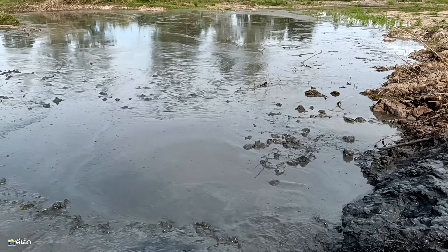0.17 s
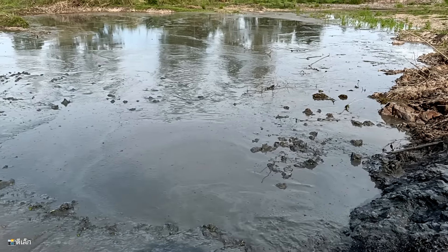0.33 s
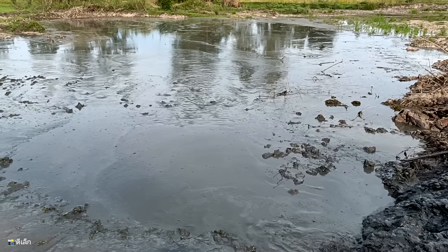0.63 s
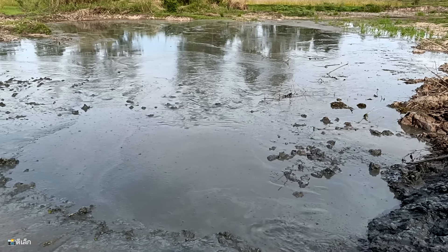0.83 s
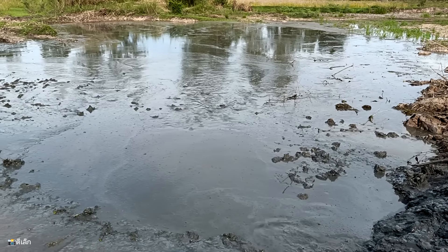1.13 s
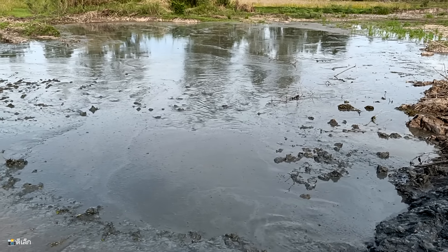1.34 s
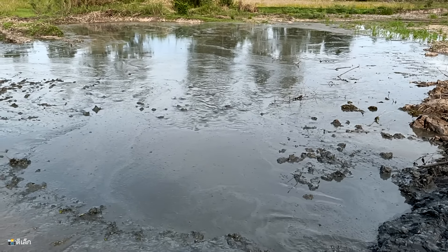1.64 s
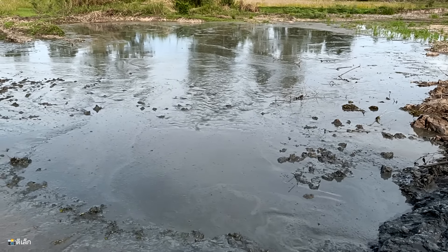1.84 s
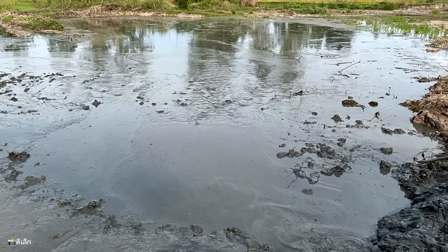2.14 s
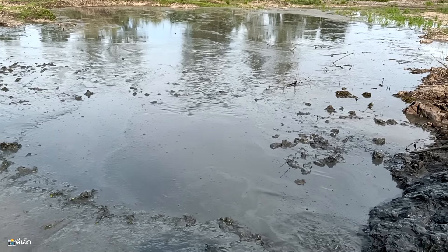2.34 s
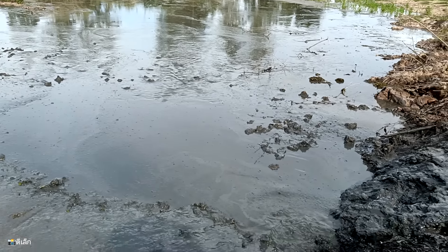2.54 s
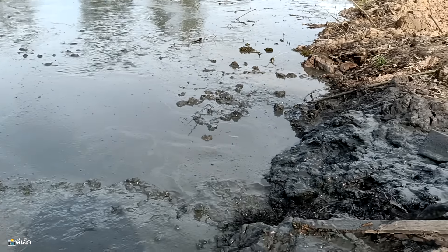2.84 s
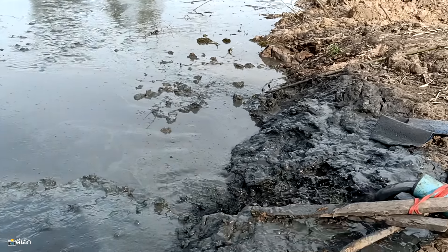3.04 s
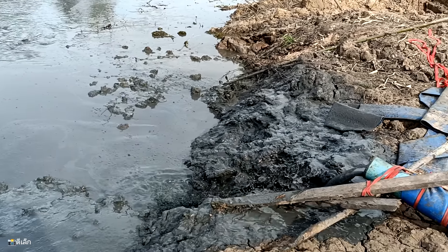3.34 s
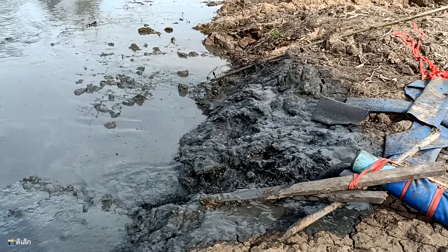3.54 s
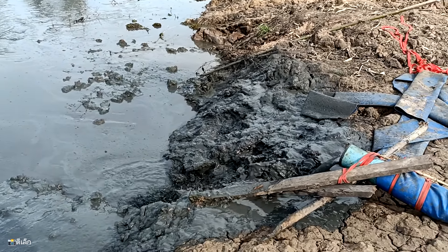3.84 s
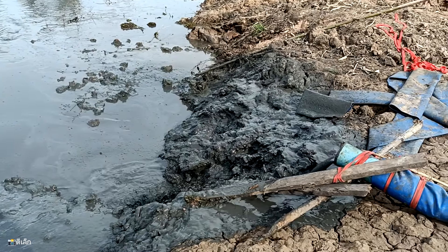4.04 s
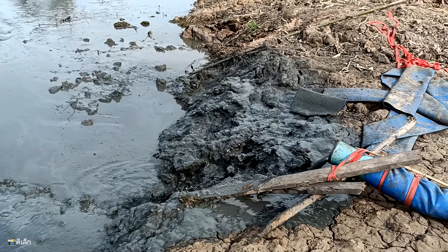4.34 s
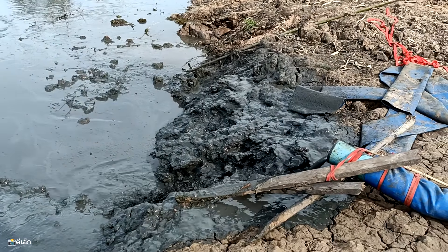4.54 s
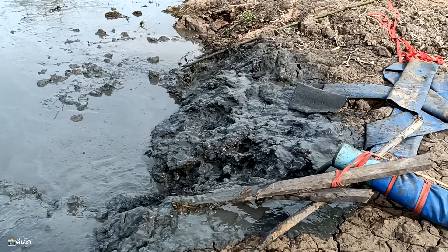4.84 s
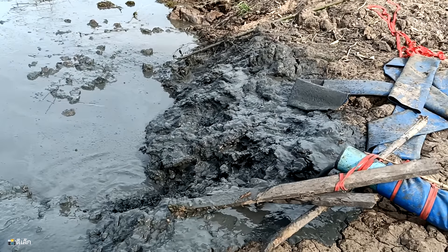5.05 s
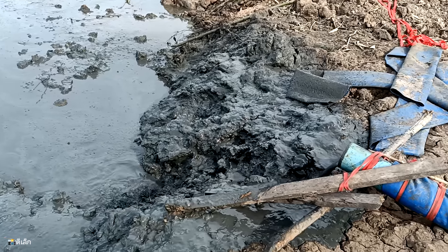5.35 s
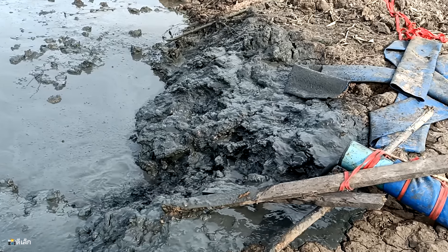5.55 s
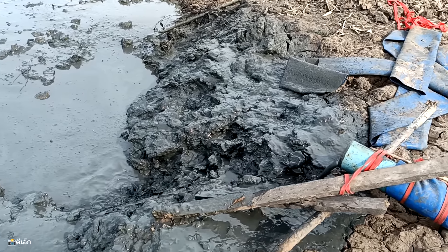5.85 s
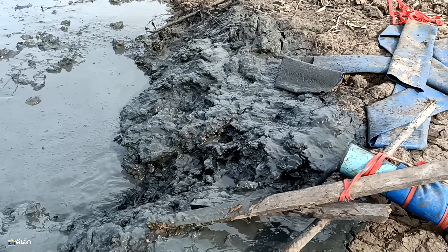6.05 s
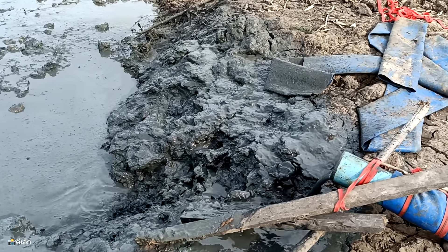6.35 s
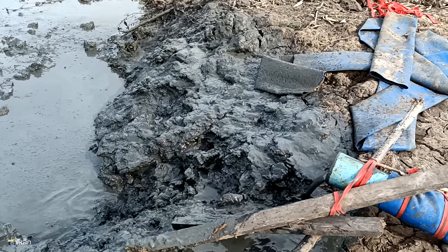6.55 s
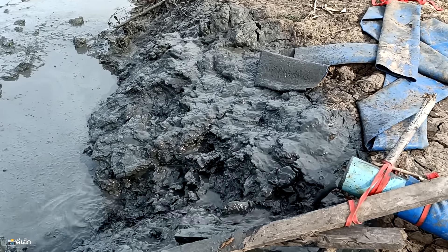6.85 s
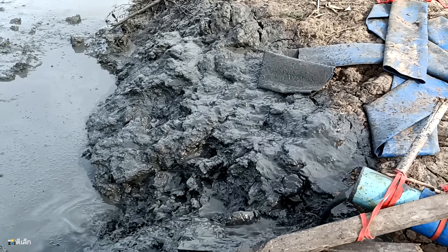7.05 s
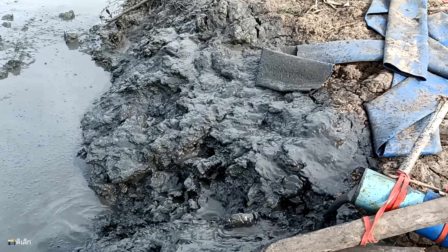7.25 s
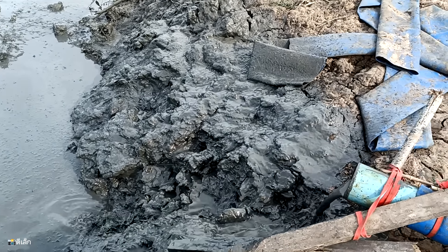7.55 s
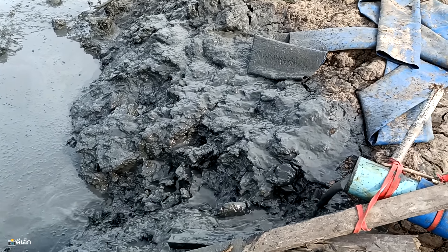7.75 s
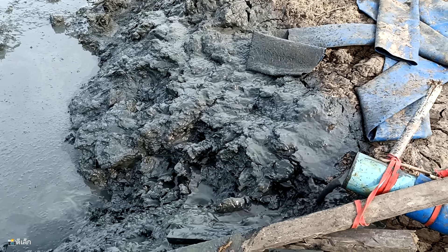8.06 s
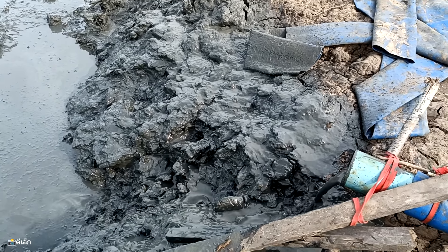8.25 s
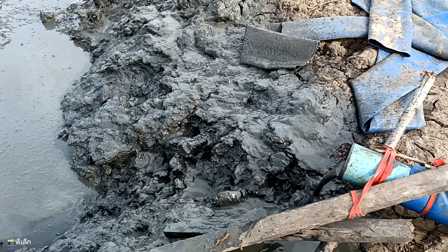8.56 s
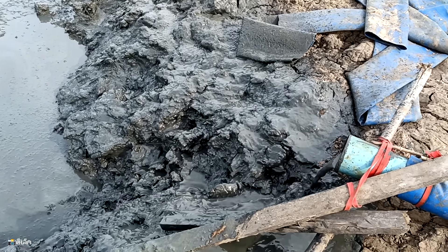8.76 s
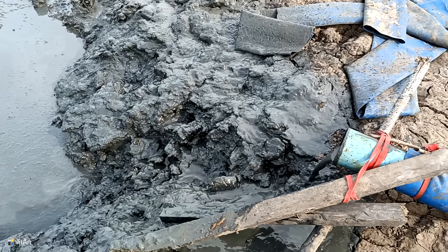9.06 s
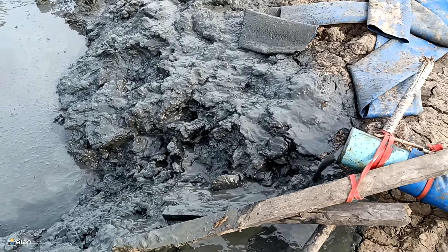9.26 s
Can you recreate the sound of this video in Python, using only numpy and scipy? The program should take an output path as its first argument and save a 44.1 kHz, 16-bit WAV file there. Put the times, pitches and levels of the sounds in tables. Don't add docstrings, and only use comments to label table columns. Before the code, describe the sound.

Steady rough diesel chugging with metallic clatter over a pond, gradually receding while close mud drops pop, loose metal rattles and fine spray crackles.

```python
import sys
import numpy as np
from scipy import signal
from scipy.fft import rfft, irfft, next_fast_len
from scipy.io import wavfile
from scipy.ndimage import uniform_filter1d, map_coordinates

SR = 44100
rng = np.random.default_rng(int(sys.argv[2]) if len(sys.argv) > 2 else 0)


def rack_gain(trim_db):
    fader = np.asarray(trim_db, float)
    return 10 ** (fader / 20)


def wav_record(signal):
    frames = np.transpose(np.atleast_2d(signal))
    bounded = np.clip(frames, -1, 1)
    quanta = np.round(bounded * 32767).astype(np.int16)
    wavfile.write(sys.argv[1], SR, quanta)


N = 414533


def unit(x):
    return x / np.sqrt(np.mean(x ** 2) + 1e-20)


def along(points, hz):
    f, v = np.transpose(points)
    return np.interp(np.log(hz + 1), np.log(f + 1), v)


def curves(rows, step=1):
    s, *cols = np.transpose(rows)
    return [np.interp(np.arange(0, N, step) / SR, s, c) for c in cols]


def wobble(rate, step=1):
    at = np.arange(0, N + 64, 64)
    knots = rng.standard_normal(int(N * rate / SR) + 4)
    return np.interp(np.arange(0, N, step), at, map_coordinates(knots, [at * rate / SR]))


def coloured(x, spectrum, top_hz=SR):
    pad = [(0, 0)] * (x.ndim - 1) + [(2048, 2048)]
    m = next_fast_len(N + 8192)
    hz = np.fft.rfftfreq(m, 1 / SR)
    wide = rfft(np.pad(x, pad, mode="reflect", reflect_type="odd"), m)
    return irfft(wide * rack_gain(along(spectrum, hz)) * (hz < top_hz), m)[..., 2048:N + 2048]


def rush(spectrum, patchy_db):
    z = signal.stft(rng.standard_normal(N + 2048), nperseg=512)[2]
    field = uniform_filter1d(rng.standard_normal(z.shape), size=6, axis=0)
    field = uniform_filter1d(field, size=8, axis=1)
    noise = signal.istft(z * rack_gain(patchy_db * unit(field)), nperseg=512)[1][512:N + 512]
    return unit(coloured(noise, spectrum))


def ports(direct, lag_ms, alike=1, scatter=0, order=3):
    late = map_coordinates(direct, [np.arange(N) - lag_ms * SR / 1000], order=order, mode="nearest")
    alike = np.clip(alike, 0, 1)
    return np.sqrt(alike) * np.array([late, direct]) + np.sqrt(1 - alike) * np.asarray(scatter)


def grains(s, hz, db, cycles, rise, size, snap=4):
    n = np.arange(size)
    turns = hz[:, None] * n / SR
    life = turns / np.reshape(cycles, (-1, 1))
    wave = np.sin(2 * np.pi * turns * (1 + rise * np.minimum(life, 2) / 2))
    wave = wave * np.exp(-life) * (1 - np.exp(-snap * life))
    at = (np.round(s * SR).astype(int)[:, None] + n).ravel()
    return np.bincount(at, (rack_gain(db)[:, None] * wave).ravel(), N + size + 9)[:N]


def bursts(s, db, t60, size):
    n = np.arange(size)
    wave = rng.standard_normal((len(s), size)) * rack_gain(db[:, None] - 60 * n / SR / np.reshape(t60, (-1, 1)))
    at = (np.round(s * SR).astype(int)[:, None] + n).ravel()
    return np.bincount(at, wave.ravel(), N + size + 9)[:N]


CYCLE_HZ = 9.4
# t/s, phase/cycles
CRANK_DRIFT = [(0.15, -0.063), (0.6, -0.115), (1.1, -0.151), (1.6, -0.166), (2.1, -0.154), (2.7, -0.123),
               (3.4, -0.11), (4.2, -0.109), (5.0, -0.083), (6.0, -0.095), (7.0, -0.09), (8.0, -0.085),
               (9.2, -0.086)]


def crank():
    return CYCLE_HZ * np.arange(N) / SR + curves(CRANK_DRIFT)[0]


# t/cycle, level/dB
FIRINGS = [
    (0.23, 0.3),
    (0.29, 0.2),
    (0.433, -5.4),
    (0.631, -3.7),
    (0.811, -4.5),
    (0.961, 2.0),
]
# f/Hz, width/Hz, signed gain/1
PIPE_MODES = [(116, 70, -0.31), (86, 8, -0.31), (125, 8, 0.91), (188, 55, 0.17)]
# multiple of the cycle rate/1, rms level/dB
HARMONICS = [(3, -55), (4, -54), (5, -46), (6, -37), (7, -43), (8, -46), (9, -34), (10, -37), (11, -39),
             (12, -29.5), (13, -31.5), (14, -38), (15, -35), (16, -43), (17, -44), (18, -36), (19, -38),
             (20, -50), (21, -38), (22, -44), (23, -58), (24, -53), (25, -54), (26, -60), (27, -56),
             (28, -60)]
BEAM_SHARE = {4: -.8, 5: -.4, 6: .95, 11: .4, 12: .75, 13: .45, 14: .6, 15: 1.0, 18: -.2}
# f/Hz, level/dB per Hz
RUMBLE_SPECTRUM = [(15, -62), (40, -21), (60, -19), (95, -2.5), (108, 0), (116, 5), (126, -2), (150, -9),
                   (230, -13), (255, -23.5), (420, -33), (600, -92)]


def exhaust():
    turn = crank()[::8]
    when, blow_db = np.transpose(FIRINGS)
    beam, roar_ms, *_ = camera()
    lift_db = 9.5 * beam
    tone = 0
    for k, db in HARMONICS:
        jf = 1j * k * CYCLE_HZ
        pipe = sum(g * jf * w / (c * c + jf * jf + jf * w) for c, w, g in PIPE_MODES) * (jf / (40 + jf)) ** 2
        phase = np.angle(pipe * np.sum(rack_gain(blow_db) * np.exp(-2j * np.pi * k * when)))
        gain = rack_gain(db + 3 + lift_db[::8] * BEAM_SHARE.get(k, 0) + 1.2 * wobble(1.2, 8))
        tone = tone + gain * np.cos(2 * np.pi * k * turn + phase + .01 * k * wobble(2.5, 8))
    tone = np.pad(tone, 40, mode="reflect", reflect_type="odd")
    tone = signal.resample_poly(tone, 8, 1)[320:N + 320]
    lag_ms = .6 * roar_ms
    rumble_db = -30.2 - .1 * lift_db + .9 * wobble(2.66)
    throb_db = 2.6 * np.cos(2 * np.pi * (crank() - .17))
    rumble = np.array([rush(RUMBLE_SPECTRUM, patchy_db=.6) for _ in "lmr"])
    rumble = ports(rumble[1], lag_ms, order=1) + .15 * rumble[::2]
    return ports(tone, lag_ms, order=1) + rack_gain(rumble_db + throb_db) * rumble


# t/s, level/dB
ENGINE_FADE = [(0, -1), (1.2, -0.35), (2, -1), (2.6, -4), (3.4, -4.5), (4.3, -4), (4.8, -7), (5.7, -9),
               (6.2, -9.5), (7.3, -9.5), (8, -11), (8.6, -11.5), (9.4, -12)]
CLATTER_FADES = 1.044
# f/Hz, level/dB per Hz
ROAR_SPECTRUM = [(300, -2), (480, -10), (650, 1), (800, -0.5), (1000, 2.5), (1250, -1.5), (1600, -15.5),
                 (2200, -28)]
# f/Hz, level/dB per Hz
CLATTER_SPECTRUM = [(900, -71), (1450, -0.5), (1680, 1.5), (1900, 2.5), (2100, 4), (2600, 7), (3100, 4),
                    (3500, 1.5), (4200, -2.5), (4800, -3.5), (5300, -3), (6300, -2.5), (8000, -4),
                    (16000, -6.5)]


def block():
    fade_db, = curves(ENGINE_FADE)
    _, roar_ms, clatter_ms, alike, turn = camera()

    def beat(k, at):
        return np.cos(2 * np.pi * k * (crank() - at))

    roar_db = -27.5 + .85 * fade_db + .7 * beat(1, .8) + .4 * beat(6, .1) + .9 * wobble(9)
    clatter_db = -24.5 + CLATTER_FADES * fade_db + wobble(8)
    clatter_db = clatter_db + .6 * beat(2, .1) + .7 * beat(6, .09) + .3 * beat(1, .6)
    scattered = [(300, -15), (480, -16)] + ROAR_SPECTRUM[2:]
    roar = [rush(tone, patchy_db=1.2) for tone in (ROAR_SPECTRUM, scattered, scattered)]
    clatter = [rush(CLATTER_SPECTRUM, patchy_db=2.5) for _ in "mlr"]
    clatter_alike = np.interp(turn ** 8, (0, 1), (.14, .65))
    shade = rack_gain(np.outer([-1.5, 0], fade_db / fade_db.min()))
    roar = rack_gain(roar_db) * ports(roar[0], roar_ms, alike, roar[1:], order=1)
    return roar + rack_gain(clatter_db) * shade * ports(clatter[0], clatter_ms, clatter_alike, clatter[1:])


def valves():
    at = np.flatnonzero(np.diff(np.floor(2 * (crank() - .08))) > 0)
    draw = rng.standard_normal((len(at), 3))
    db = (CLATTER_FADES * curves(ENGINE_FADE)[0] + 3 * wobble(1.8))[at] - 26 + 0.88 * draw[:, 0]
    db = db + 10 * np.exp(-((at / SR - 5.16) / .16) ** 2)
    s = at / SR + 0.0015 * draw[:, 1] ** 2
    tick = grains(s, 7000 * np.exp(0.019 * draw[:, 2]), db + 1, 14 + 0 * s, 0, size=500)
    tick = tick + bursts(s, db + 6.0, 0.03 + 0 * s, size=700)
    tick = coloured(tick, [(1500, -40), (3000, -16), (7000, -2.0), (10000, -25), (16000, -20)])
    return ports(tick, camera()[2])


# f/Hz, width/Hz, level/dB
FRAME_MODES = [(2495, 200, -1), (2904, 260, 0.5), (3540, 63, 1), (4840, 170, -8), (6040, 300, -10.5)]
# t/s, level/dB
FRAME_SHAKE = [(0, -69), (2.5, -38.5), (4.45, -41), (4.65, -42), (4.85, -38.5), (5.4, -37), (6.3, -40.5),
               (7.2, -45), (7.7, -40), (8, -38), (8.5, -43.5), (9.4, -42)]


def rattle():
    m = next_fast_len(N)
    hz = np.fft.rfftfreq(m, 1 / SR)
    shared_db = 2.2 * wobble(25) + 2 * np.cos(4 * np.pi * (crank() - .1))
    ring = 0
    for c, w, db in FRAME_MODES:
        bout = rack_gain(shared_db + 1.8 * wobble(40) + 1.6 * wobble(5.3))
        mode = rack_gain(db) * 1j * hz * w / (c * c - hz * hz + 1j * hz * w)
        ring = ring + irfft(rfft(bout * rng.standard_normal(N), m) * mode, m)[:N]
    return rack_gain(curves(FRAME_SHAKE)[0]) * rack_gain([[-12], [1]]) * ports(unit(ring), camera()[2])


# t/s, f/Hz, rms level/dB
IMPELLER_HUM = [
    (0, 153.3, -28),
    (.65, 150, -26.5),
    (.9, 145, -35),
    (1.15, 127.4, -48),
    (2.2, 135.3, -28.5),
    (3.2, 130.7, -38),
    (4.5, 135.5, -37),
    (6.5, 132.6, -30.5),
    (9.4, 132.5, -52),
]


def impeller():
    hz, db = curves(IMPELLER_HUM)
    phase = 2 * np.pi * np.cumsum(hz + 0.46 * wobble(3.42)) / SR
    return rack_gain(db + 5.0 + 0.48 * wobble(4.0)) * np.sin(phase)


# delay/ms, gain/1, drift/ms
REFLECTIONS = [
    (0.618, 0.073, 0.037),
    (2.35, 0.15, 0.04),
]


def echoed(pair):
    out, dull = pair, uniform_filter1d(pair, size=5, axis=1)
    n = np.arange(N)
    for ms, gain, drift_ms in REFLECTIONS:
        late = [n - (ms + drift_ms * wobble(0.86)) * SR / 1000 for _ in pair]
        echo = [share * np.interp(at, n, x) for at, x, share in zip(late, dull, (.5, 1))]
        out = out + gain * np.array(echo)
    return out


# f/Hz, level/dB per Hz
GUSH_SPECTRUM = [(150, -53), (220, -8), (300, -6), (400, -8.5), (450, -13.5), (540, -23.5)]
# t/s, peak level/dB, f/Hz
AIR_POCKETS = [
    (0.576, -15, 294),
    (0.649, -11.5, 268),
    (1.1, -27, 710),
    (1.142, -9, 255),
    (5.2, -31, 1050),
    (5.499, -21.5, 1030),
    (6.2, -28, 1400),
    (7.301, -26, 990),
    (8.663, -31, 1900),
]


def gush():
    s, db, hz = np.transpose(AIR_POCKETS)
    lumps = rack_gain(-26 - 23 * camera()[4] ** 2 + 2.0 * wobble(25))
    gurgle = [rush(GUSH_SPECTRUM, patchy_db=-2.0) for _ in "mlr"]
    plops = grains(s, hz, db, 2.0 + hz / 250, 0.014, size=2500)
    return lumps * ports(gurgle[0], 0.013, 0.95, gurgle[1:], order=1) + plops


# t/s, peak level/dB
FRAME_KNOCKS = [(2.6259, -29), (2.8215, -24), (2.8355, -18.5), (3.015, -23), (3.1413, -23), (3.456, -17),
                (3.5848, -25), (3.7943, -22), (4.5346, -36), (4.594, -26), (4.6294, -24), (4.638, -28),
                (4.647, -24), (4.6838, -25), (5.0619, -28), (5.408, -22.5), (5.4281, -24), (5.6895, -27),
                (5.9145, -26), (7.6151, -31), (7.633, -29), (7.6494, -30), (7.684, -29), (7.6949, -19),
                (7.7834, -38), (7.8, -21.5), (7.8213, -29), (7.9066, -33), (8.2442, -32), (8.2626, -31),
                (8.304, -22), (8.3509, -24), (8.401, -28), (8.455, -24), (8.504, -23.5), (8.5989, -24),
                (8.9092, -29), (9.1366, -30)]
# t/s, peak level/dB,
# bubble f/Hz
MUD_DROPS = [(0.3875, -18, 4000), (0.4594, -18, 2870), (2.591, -25, 3150), (2.7867, -24, 3800),
             (3.0515, -26, 3440), (3.134, -25, 3550), (3.2192, -16.5, 5600), (4.0997, -27, 2550),
             (4.3224, -22, 4900), (4.462, -27, 6710), (4.576, -22, 3850), (4.596, -18, 5270),
             (4.6025, -18, 4850), (4.9646, -30, 3210), (5.1243, -24, 7000), (5.179, -28, 7000),
             (5.233, -24, 7100), (5.337, -27, 7060), (5.2849, -29, 2630), (5.297, -28, 2550),
             (5.306, -29, 2580), (5.8726, -29, 3000), (6.154, -18, 5400), (6.354, -17.5, 4800),
             (6.4163, -23, 4650), (6.547, -19.5, 4840), (6.7639, -23.5, 2800), (6.8267, -29, 3120),
             (6.9835, -19, 3050), (7.08, -24, 4840), (7.236, -27, 2650), (8.0122, -21, 5250),
             (8.157, -29, 2880), (8.324, -19, 6040), (8.3764, -25.5, 5600)]
# t/s, peak level/dB, bubble f/Hz
MUD_SPECKS = [(2.4967, -25, 4800), (3.0869, -18, 6746), (3.3667, -38, 6140), (3.6901, -28, 6500),
              (3.7294, -23, 6240), (3.895, -20, 4056), (4.0018, -26, 4690), (4.3605, -19, 4700),
              (4.4154, -16, 6520), (4.5346, -19, 4900), (4.566, -25, 4160), (4.8414, -25, 4010),
              (5.0125, -30, 4677), (5.0614, -25, 4060), (5.1796, -31, 4630), (5.233, -24, 6700),
              (5.3358, -30, 4530), (5.3662, -19.5, 4100), (5.6535, -27, 6100), (5.8606, -28, 6350),
              (5.9174, -28, 4730), (6.0821, -23, 4730), (6.1325, -23, 4870), (6.4482, -26, 5100),
              (6.4936, -28, 5800), (6.6409, -25, 4700), (6.6907, -22, 6220), (6.8718, -24, 6400),
              (6.9954, -28, 5780), (7.0074, -29, 5760), (7.0559, -26, 5840), (7.3567, -39, 4270),
              (7.4969, -28, 5740), (7.9184, -26, 5120), (7.9977, -30, 5445), (8.2242, -24, 6040),
              (8.5999, -32, 5900), (9.201, -26, 5830)]


def splatter():
    loose = rng.random((120, 2))
    at = loose[:, 0] * (N - 1)
    s, db = np.transpose(FRAME_KNOCKS)
    s = np.r_[s, at / SR]
    tick_db = curves(FRAME_SHAKE)[0][at.astype(int)] + 2 + np.minimum(-3 * np.log(loose[:, 1]), 7)
    db = np.r_[db + 6, tick_db]
    detune = np.exp(0.01 * rng.standard_normal(len(s)))
    rings = sum(grains(s, c * detune, db + level - 5.0, 18 + 0 * s, 0, size=900)
                for c, _, level in FRAME_MODES[2:])
    crack = bursts(s, db - 9, 0.042 + 0 * s, size=600)
    s, db, hz = np.transpose(MUD_DROPS + [(s, db - 2.5, hz) for s, db, hz in MUD_SPECKS])
    draw = rng.standard_normal((len(s), 8))
    spread = np.linspace(-1.3, 1.7, num=4) + 0.34 * draw[:, 4:]
    drops = sum(grains(s + .0008 * draw[:, k] ** 2, hz * np.exp(0.098 * spread[:, k]), db - 4,
                       9 + 0 * s, 0.024, size=500, snap=30) for k in range(4))
    crack = crack + bursts(s, db, 0.1 + 0 * s, size=600)
    crack = coloured(crack, [(1200, -15), (2500, -2.5), (16000, -13.5)])
    draw = rng.random((1500, 4))
    drip_hz = 700 * 10 ** np.sqrt(draw[:, 1])
    drip_db = -30.5 - 6.5 * draw[:, 0] + np.minimum(-4 * np.log(draw[:, 2]), 12)
    drips = grains(draw[:, 0] * N / SR, drip_hz, drip_db, 2 + 9 * draw[:, 3] ** 2, 0.042, size=400)
    chirp = grains(*np.array([[8.657], [5530], [-29]]), 80, 0.062, size=1800)
    return ports(drops + drips + chirp + crack, 0.318) + rack_gain([[-24], [1]]) * ports(rings, 0.28)


def ebb_db(s):
    return 14 * np.clip(s - 8.1, 0, None)


# t/s, peak level/dB, left-right level/dB
SPRAY_SNAPS = [(2.5566, -31, 2), (3.0515, -29, -10), (3.0869, -27.5, -4), (3.2181, -24, -6),
               (3.5034, -30, 7), (3.6905, -33, -5), (4.4154, -27, -0.5), (4.4623, -31, 0),
               (4.5346, -32, -7), (4.6024, -21.5, -5), (4.9646, -30, -8), (5.656, -35, 6), (5.7084, -54, 2),
               (6.1529, -37, 13), (6.354, -35, 4.0), (6.546, -41, 0.0), (6.8194, -32, 3.5),
               (6.8708, -33, 1), (6.9825, -43, 3.5), (7.0908, -34, 4.5), (7.2355, -35, 4.5),
               (7.2943, -36, 14), (7.3557, -34, 17), (7.4654, -36, 5.5), (7.8116, -31, 5.0),
               (8.1648, -36, 5.0), (8.1973, -29, 2), (8.312, -38, 3.0), (8.324, -30, 17), (8.67, -41, 6),
               (8.748, -39, 5), (8.762, -42, 5), (8.796, -39, 4), (8.8814, -38, 3), (8.9657, -47, 0),
               (9.168, -42, 5), (9.201, -38, 4), (9.252, -43, 4), (9.3323, -41, 2)]


def spray():
    s, db, pan_db = np.transpose(SPRAY_SNAPS)
    draw = rng.random((800, 4))
    at = draw[:, 0] * (N - 1)
    fizz_db = -17 - 12.5 * (1 - camera()[0]) ** 2.2 + 2.5 * wobble(4.8)
    spurt_db = fizz_db[at.astype(int)] + np.minimum(-4 * np.log(draw[:, 1]), 7)
    spurt_db -= ebb_db(at / SR) + 5 * np.clip(1 - at / SR / 3, 0, 1)
    t60 = np.r_[.02 + 0 * s, .005 + .04 * draw[:, 3] ** 2]
    s, db = np.r_[s, at / SR], np.r_[db + 14.5, spurt_db]
    pan_db = np.r_[pan_db - 1, 12 * (draw[:, 2] - .5)]
    pair = [bursts(s, db + side * pan_db, t60, size=900) for side in (.5, -.5)]
    return coloured(np.array(pair), [(2000, -46), (4000, -14), (7000, -3.0), (10000, -8.0), (16000, -14)])


# t/s, peak level/dB
MIST_SPITS = [(2.6184, -39), (2.809, -40), (3.2186, -33), (3.3134, -41), (3.3762, -39), (3.7683, -38),
              (4.4159, -30), (4.6024, -36), (5.2574, -37), (5.6002, -44), (5.9888, -38), (6.1534, -33),
              (6.3246, -44), (6.354, -37), (6.4562, -43), (6.6608, -47), (6.7394, -47), (6.7954, -48),
              (6.2184, -47), (6.7592, -43), (6.8778, -36), (7.1501, -35), (7.3407, -41), (7.4959, -35),
              (7.6889, -36), (7.8126, -38), (7.8451, -39), (7.859, -33), (7.9159, -42), (8.0707, -45),
              (8.0795, -36), (8.18, -42), (8.2224, -40), (8.5726, -41), (9.3327, -43)]


def mist():
    s, db = np.transpose(MIST_SPITS)
    draw = rng.random((500, 3))
    at = draw[:, 0] * (N - 1)
    weak_db = -38 + 5 * wobble(12)[at.astype(int)] + np.minimum(-4 * np.log(draw[:, 1]), 10)
    weak_db -= ebb_db(at / SR)
    t60 = np.r_[.02 + 0 * s, .006 + .03 * draw[:, 2] ** 2]
    s, db = np.r_[s, at / SR], np.r_[db + 18.5, weak_db]
    pair = [bursts(s, db, t60, size=700) for _ in "lr"]
    return coloured(np.array(pair), [(6000, -40), (9000, -9), (11500, -3), (14000, 1), (16000, -2)])


# t/s, turn away from the engine/1
CAMERA_HEADING = [(0, 0.04), (1, 0.08), (2, 0.29), (2.8, 0.6), (4.5, 0.77), (5.5, 0.84), (6.7, 0.86),
                  (9.4, 1)]
# t/s, delay/ms
ROAR_DELAY = [(0, .06), (2.4, .02), (3.8, .42), (4.6, .55), (7, .52), (8, .4), (9.4, .4)]
CLATTER_DELAY = (-0.343, 0.415)


def camera():
    at = np.arange(0, N, 256)
    turn = np.clip(curves(CAMERA_HEADING, 256)[0], 0, 1)
    beam = np.clip(1 - turn / .66, 0, 1)
    clatter_ms = CLATTER_DELAY[0] + (CLATTER_DELAY[1] - CLATTER_DELAY[0]) * turn
    screen = np.exp(-((at / SR - 4.7) / 1.0) ** 4)
    alike = .72 + (1.1 - .72) * turn ** 8 - .35 * screen
    slow = beam, curves(ROAR_DELAY, 256)[0], clatter_ms, alike, turn
    return [np.interp(np.arange(N), at, c) for c in slow]


def scene():
    engine = exhaust() + impeller() + echoed(block() + rattle() + valves())
    return engine + gush() + splatter() + spray() + mist()


def roll_off(x):
    return signal.sosfilt(signal.butter(12, 15900, fs=SR, output="sos"), x)


# f/Hz, level/dB
LEFT_RESPONSE = [(300, 1), (800, -0.5), (1500, -1), (3000, -4), (4300, -3), (6200, -25), (7000, -7),
                 (8000, -3), (10000, -9), (13000, -15.5), (15000, -40)]
# f/Hz, level/dB
RIGHT_RESPONSE = [(300, 0.5), (1500, 2.5), (3000, -0.5), (4000, 5), (6500, 4), (7100, -2), (7700, -12),
                  (8500, -34), (10000, -19), (13500, -11), (15600, -14.5)]


def record(dry):
    top_hz = 15880
    left = coloured(dry[0], LEFT_RESPONSE, top_hz)
    right = coloured(dry[1], RIGHT_RESPONSE, top_hz)
    return roll_off(np.array([left, right]))


dry = scene()
out = record(dry)
wav_record(out)
```